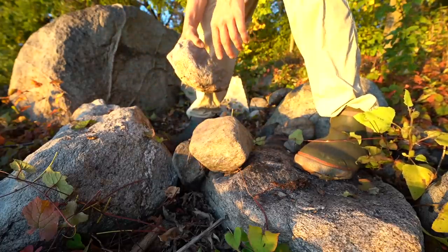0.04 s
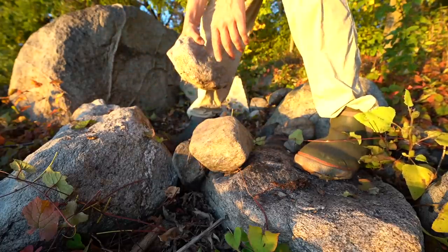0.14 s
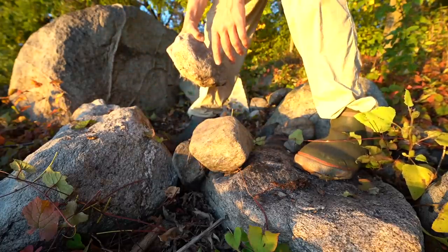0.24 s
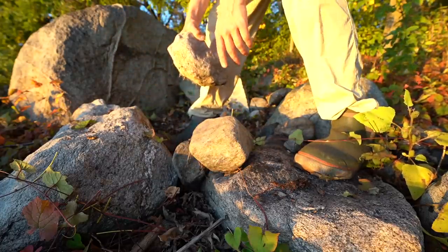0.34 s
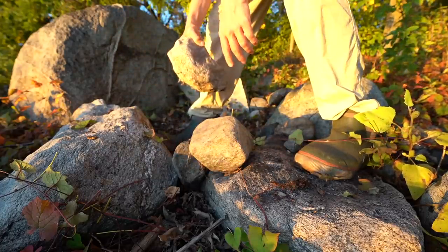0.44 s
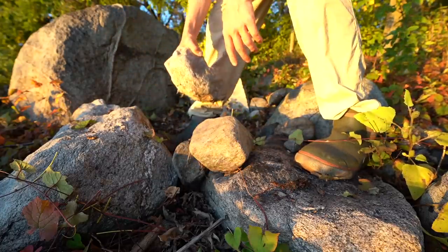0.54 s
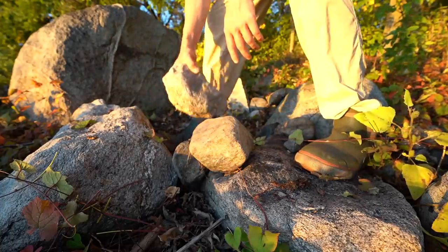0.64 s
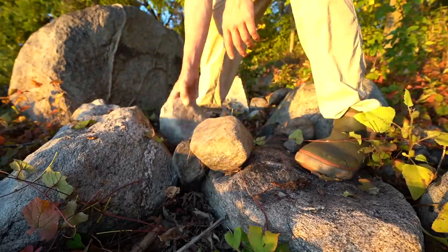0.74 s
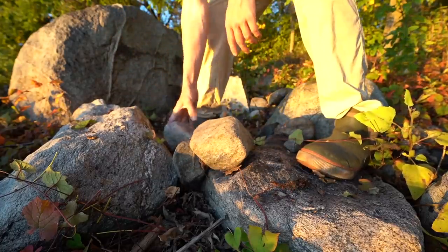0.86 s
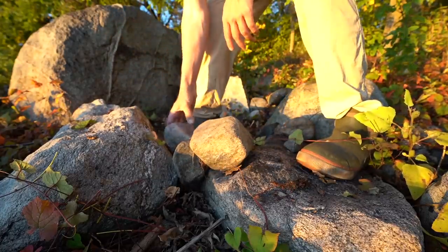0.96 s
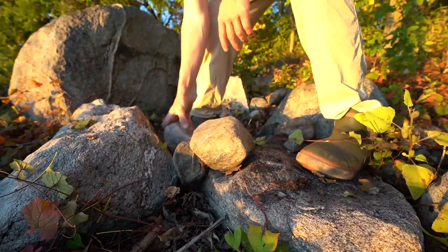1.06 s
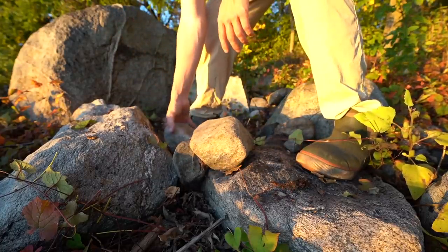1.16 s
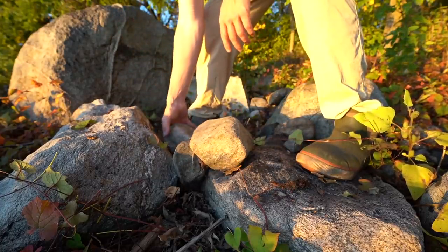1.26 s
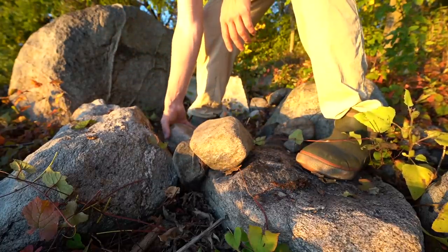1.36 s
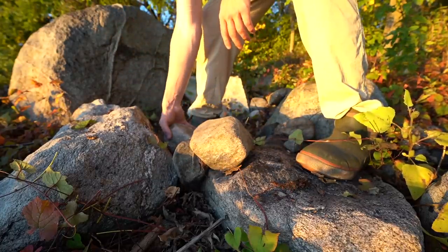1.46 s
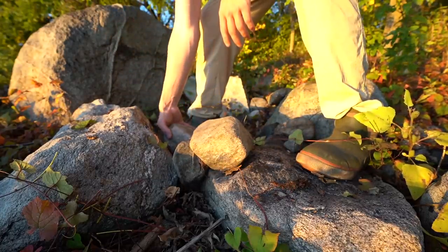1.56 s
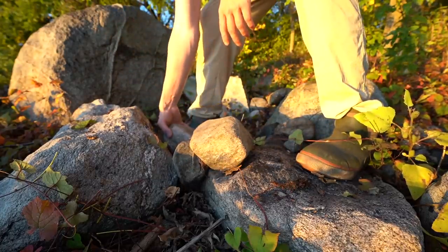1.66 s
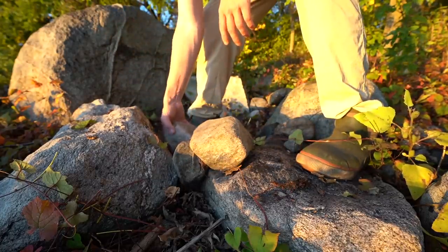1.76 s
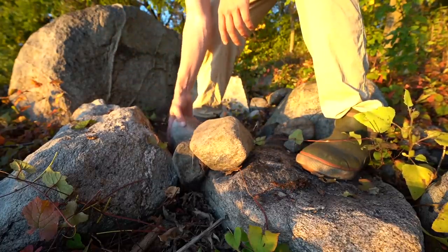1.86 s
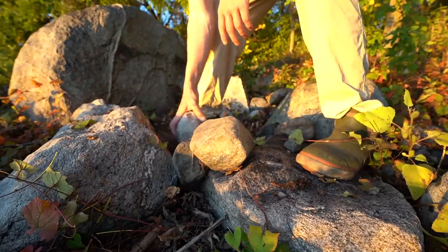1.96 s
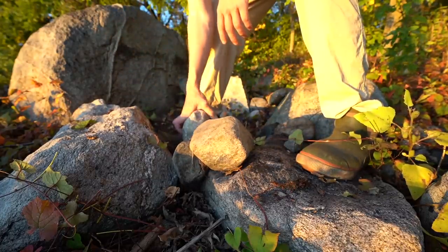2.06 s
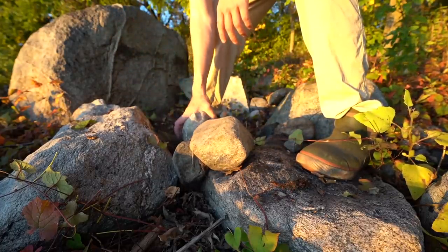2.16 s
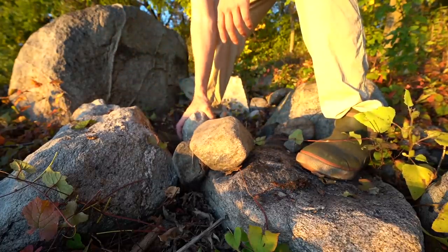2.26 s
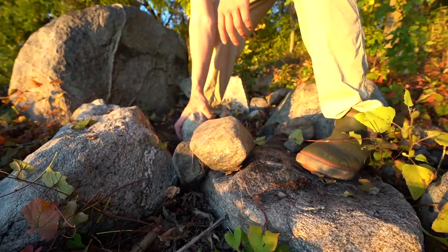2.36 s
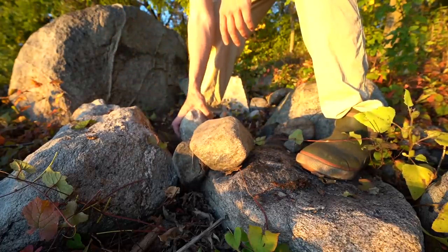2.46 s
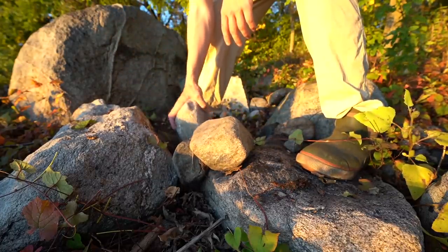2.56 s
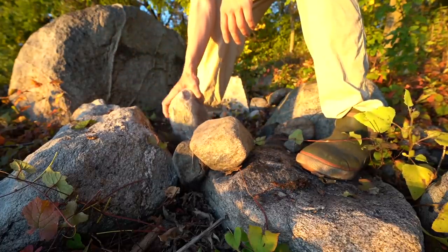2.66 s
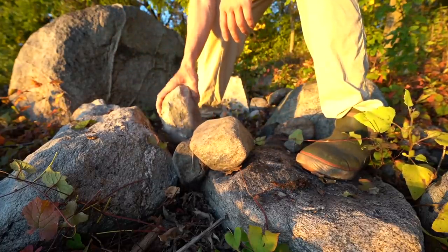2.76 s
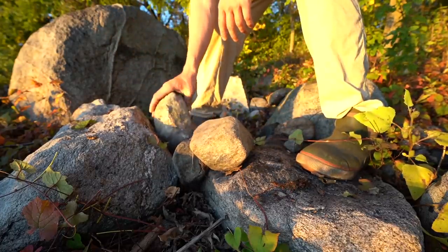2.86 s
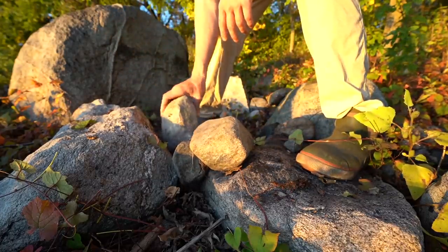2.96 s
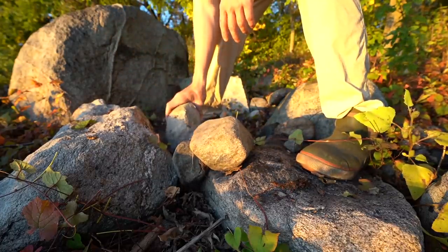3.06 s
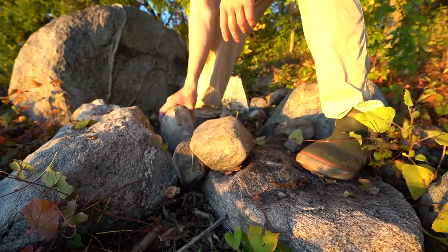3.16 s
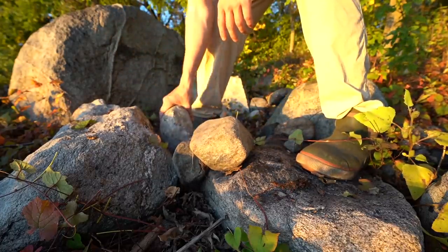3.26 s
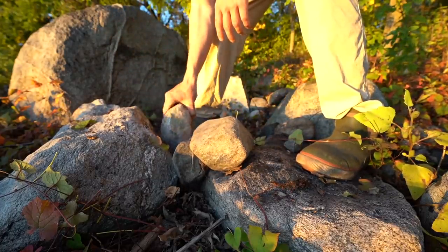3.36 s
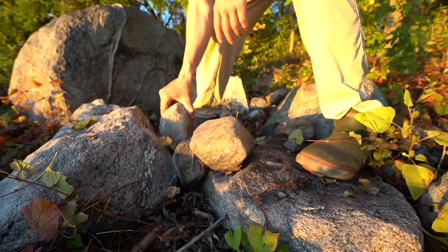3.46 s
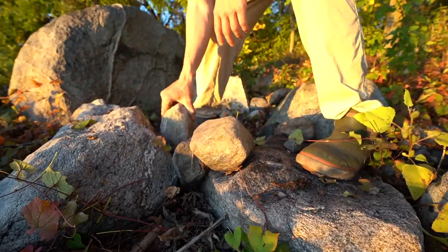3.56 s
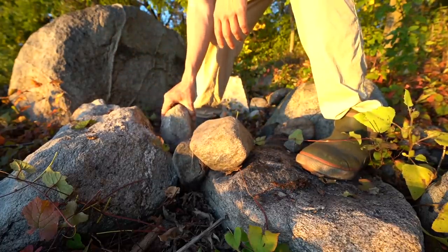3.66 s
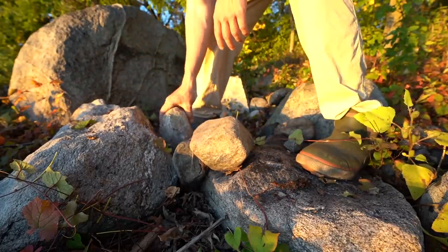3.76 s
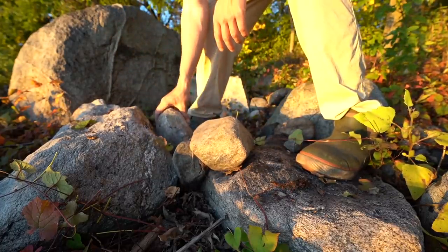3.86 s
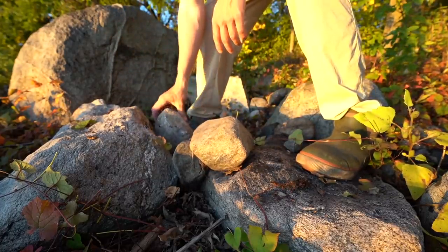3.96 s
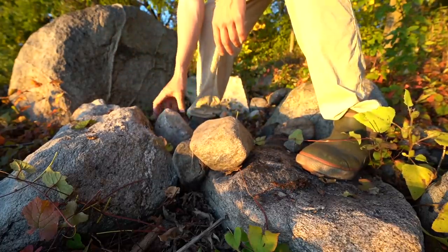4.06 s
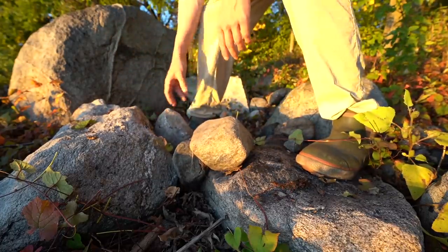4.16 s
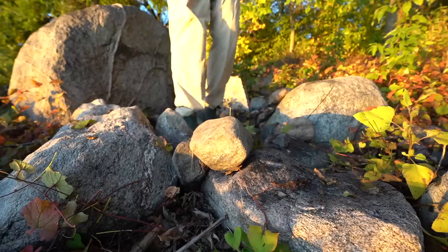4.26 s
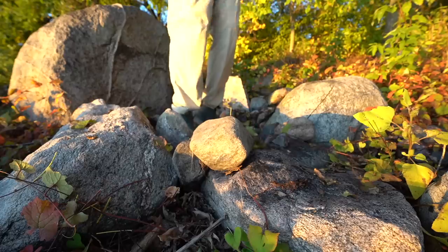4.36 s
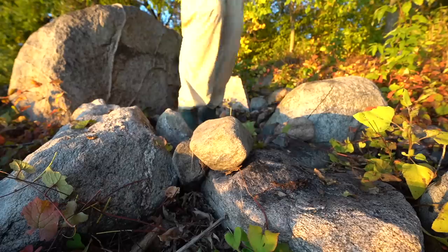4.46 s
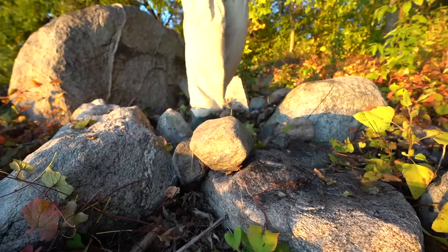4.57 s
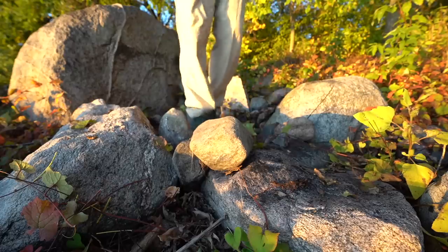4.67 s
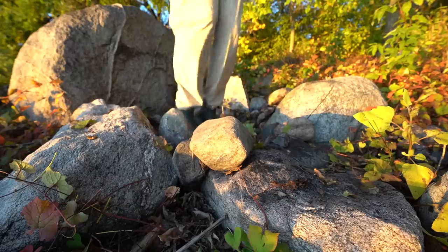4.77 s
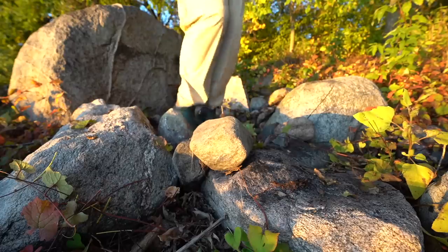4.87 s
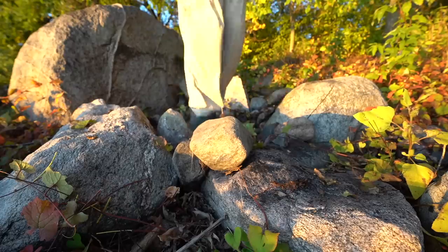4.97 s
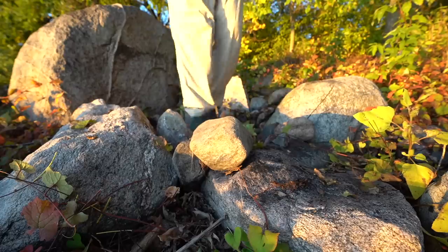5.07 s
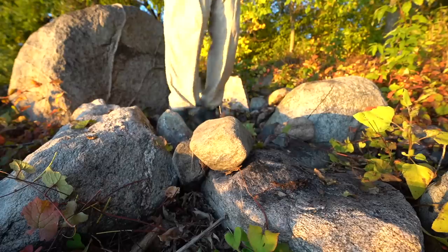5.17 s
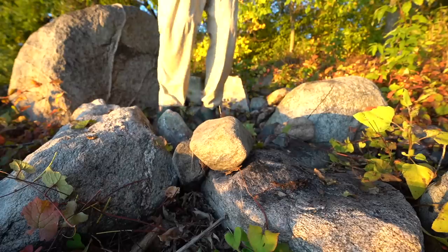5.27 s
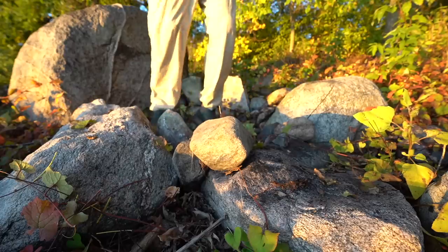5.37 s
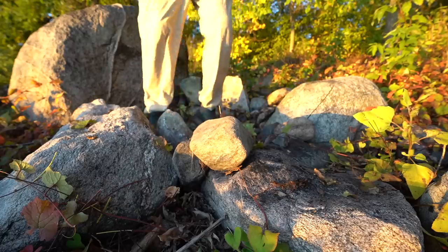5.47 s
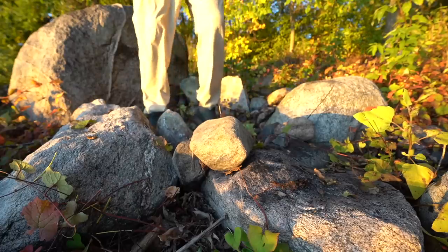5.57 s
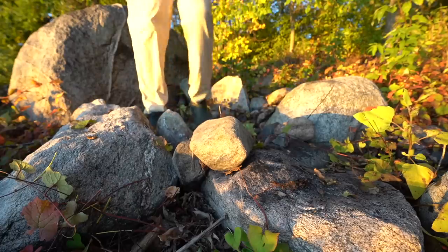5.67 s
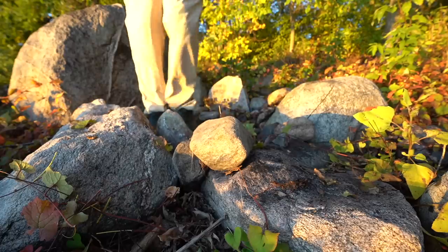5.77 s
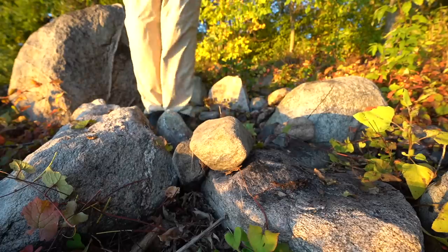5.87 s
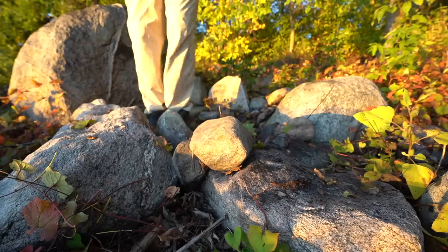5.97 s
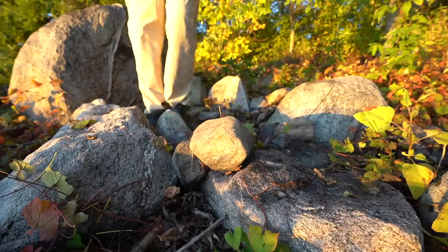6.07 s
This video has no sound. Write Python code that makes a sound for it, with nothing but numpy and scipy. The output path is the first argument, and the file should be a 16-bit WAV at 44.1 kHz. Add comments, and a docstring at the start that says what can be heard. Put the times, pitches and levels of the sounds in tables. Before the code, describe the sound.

Close, dry and detailed: faint stone taps, then a hard triple knock of rock on rock, grinding briefly. Near silence with light rustling and a soft scrape follows, then more solid knocks, a bright chip and smaller rattling contacts as the stone settles. Much quieter dull treads and leaf crunches finish the scene, with small snaps, against soft woodland air, low far rumble and thin insect hiss.

```python
"""A rock is set down in a ring of stones in quiet woodland, shifted, lifted and seated again; then feet
shuffle on dry leaves. Each knock is a short contact pulse with dense reflections off the stones, a hollow
ring from the gap and a slower thump from the soil. Dragged stone grinds and chatters, filtered clicks make
the snaps, and clouds of tiny fractures make grit and leaves. Behind lie a dull tail from the trees, a faint
far rumble, soft air and narrow noise bands for the insects."""
import sys
import numpy as np
from scipy import signal
from scipy.fft import rfft, irfft
from scipy.io import wavfile

SR = 44100
rng = np.random.default_rng(int(sys.argv[2]) if len(sys.argv) > 2 else 0)


def generate_wav(signal):
    """Clip the signal to [-1, 1] and save it as 16-bit WAV at the path in sys.argv[1]."""
    frames = np.transpose(np.atleast_2d(signal))
    scaled = np.clip(frames, -1, 1) * 32767
    pcm = np.round(scaled).astype(np.int16)
    wavfile.write(sys.argv[1], SR, pcm)


N = 269976
T = np.arange(N) / SR

# relative spectrum of crushed grit and rustling leaves: (frequency [Hz], level [dB])
GRIT_SPECTRUM = [(900, 2.5), (1800, 2), (3300, 5.5), (5500, -5), (9000, -3.5), (15000, -6)]


def undb(db):
    """Decibels to gain."""
    return 10 ** (np.asarray(db) / 20)


def unit(x):
    """Scale to rms 1."""
    return x / np.sqrt(np.mean(x ** 2))


def burst(x):
    """Scale a blow to the energy of 10 ms at rms 1."""
    return x * np.sqrt(0.01 * SR / np.sum(x ** 2))


def fade(t60):
    """Half a second of exponential decay that falls 60 dB in t60 seconds."""
    return np.exp(-np.log(1000) * T[:SR // 2] / max(t60, 1e-4))


def ring(hz, t60):
    """One struck mode: a decaying sine."""
    return fade(t60) * np.sin(2 * np.pi * hz * T[:SR // 2])


def cut(x, hz, kind, order=2):
    """Butterworth low-pass or high-pass."""
    corner_hz = min(hz, SR / 2 - 1000)
    return signal.sosfilt(signal.butter(order, corner_hz, kind, fs=SR, output="sos"), x)


def colour(x, points):
    """Give a sound the spectrum of (Hz, dB) points with minimum phase, so nothing sounds early; rms 1."""
    hz, db = np.transpose(points)
    size = 4096
    log_hz = np.log(np.fft.rfftfreq(size, 1 / SR) + 1)
    gain = undb(np.interp(log_hz, np.log(hz), db))
    # folding the cepstrum onto positive time makes the filter causal
    cepstrum = irfft(np.log(gain))
    cepstrum[1:size // 2] *= 2
    cepstrum[size // 2 + 1:] = 0
    impulse = irfft(np.exp(rfft(cepstrum)))
    return unit(signal.fftconvolve(x, impulse)[:len(x)])


def add(out, s, x):
    """Mix a sound in at time s."""
    i = int(s * SR)
    out[i:i + len(x)] += x[:N - i]


def grains(per_s, spread_db):
    """Random tiny fractures as single-sample clicks, most small and a few large; rms 1."""
    size = undb(spread_db * np.minimum(rng.exponential(size=N), 3.5))
    happens = rng.random(N) < per_s / SR
    return unit(happens * size * rng.choice([-1, 1], N))


def crackle(per_s, spread_db, t60):
    """Each fracture is a brief rasp of noise in the band of its own fragment size; rms 1."""
    # size classes of crackling fragments, large to small: (band edge [Hz])
    edges = [700, 2000, 3800, 7000, 11000, 16500]
    out = np.zeros(N)
    for low_hz, high_hz in zip(edges, edges[1:]):
        envelope = signal.fftconvolve(np.abs(grains(per_s, spread_db)), fade(t60))[:N]
        rasp = envelope * rng.standard_normal(N)
        out += cut(cut(rasp, low_hz, "high", order=3), high_hz, "low", order=3)
    return unit(out)


def scattered(scatter_db, t60):
    """A pulse followed by a decaying noise tail: its reflections from the stones close by."""
    tail = rng.standard_normal(SR // 2) * fade(t60)
    tail *= undb(scatter_db) / np.sqrt(np.sum(tail ** 2))
    tail[0] += 1
    return tail


def clack(low_hz, corner_hz):
    """One contact of two stones; high spots on the rough faces add a harder edge to the broad pulse."""
    blow = cut(scattered(scatter_db=5, t60=0.026), low_hz, "high")
    broad = cut(blow, corner_hz, "low", order=6)
    edge = cut(blow, 1.362 * corner_hz, "low", order=4)
    return burst(broad + undb(-12.5) * edge)


def catching(hz, depth_db):
    """Gain of a contact that sticks and gives way at uneven moments; rms 1."""
    wander = unit(cut(rng.standard_normal(N), hz, "low"))
    return unit(undb(depth_db * np.tanh(wander)))


def swell(s, rise, fall):
    """Pressure that builds smoothly to its peak at time s, then lets go exponentially."""
    return np.exp(-np.where(T < s, ((T - s) / rise) ** 2, (T - s) / fall))


def pressing(rows):
    """Summed swells of (s, rise, fall, dull dB, crisp dB) rows: gains of the dull and the crisp part."""
    pushes = np.array([swell(s, rise, fall) for s, rise, fall, _, _ in rows])
    _, _, _, dull_db, crisp_db = np.transpose(rows)
    return undb(dull_db) @ pushes, undb(crisp_db) @ pushes


def knocks():
    """A longer contact gives a duller knock; the gaps between the stones ring briefly and the soil rebounds."""
    # rock on rock: (time [s], level [dB], low cut [Hz], contact corner [Hz],
    # hollow ring relative to the clack [dB], soil thump [dB])
    contacts = [(0.0681, -51, 400, 3500, -20, -70), (0.071, -53, 130, 610, -0.5, -74),
                (0.121, -66, 300, 2800, -15, -77), (0.513, -59.5, 200, 790, -9, -78),
                (0.601, -64.5, 200, 670, 2, -77), (0.831, -13, 117, 1860, -15.5, -27),
                (0.8375, -13, 140, 2120, 0, -30), (0.8788, -14.5, 390, 1360, -17, -30),
                (0.9046, -31, 200, 2120, -9.5, -43.5), (0.924, -24.5, 150, 4900, -7.5, -28.5),
                (0.963, -25, 209, 1215, -8.5, -27.5), (1.007, -44.5, 120, 880, 2, -53.5),
                (1.028, -50.5, 120, 1000, -8, -57), (1.912, -43, 130, 800, -28, -38.5),
                (2.159, -54, 100.6, 1300, -11.5, -43.5), (2.53, -57, 297.8, 1090, -11, -58),
                (2.8617, -18, 130, 1577, 0, -33), (2.9287, -23, 90, 1360, -20, -25),
                (2.972, -49, 200, 1470, 0, -41), (3.002, -54, 130, 1400, -18, -46),
                (3.069, -43, 150, 1420, 2, -37), (3.095, -43.5, 150, 1400, -30, -38),
                (3.202, -43.5, 150, 1520, -12, -34), (3.257, -35.5, 243, 830, 0, -40),
                (3.416, -56, 150, 2040, -17.5, -43), (3.4996, -17, 147, 2060, -2.5, -33),
                (3.518, -37.5, 150, 810, -1, -33), (3.5426, -38.5, 150, 1520, -7, -39.5),
                (3.616, -41, 151, 1930, -14, -40), (3.8066, -39.5, 111, 1590, -1.5, -41),
                (3.936, -47, 120, 710, -5, -41.5), (4.039, -61, 120, 598, -15.5, -48.5)]
    # modes of the soil under the stones: (centre frequency [Hz], relative level [dB], t60 [s])
    soil_modes = [(61.54, 4, 0.25), (72.28, -4.5, .24), (118, -8.5, .2), (175, -7, .11), (266, -10.5, 0.09)]
    out = np.zeros(N)
    for s, db, low_hz, corner_hz, ring_db, soil_db in contacts:
        hollow = cut(ring(0.69 * corner_hz, t60=0.017), 1.1 * corner_hz, "low", order=4)
        stone = burst(clack(low_hz, corner_hz) + undb(ring_db) * burst(hollow))
        add(out, s, undb(db) * stone)

        # the soil yields slowly, so its thump swells after the knock
        soil = np.zeros(SR // 2)
        for hz, mode_db, t60 in soil_modes:
            detune = 1 + 0.033 * rng.standard_normal()
            soil += undb(mode_db) * ring(hz * detune, t60)
        add(out, s, undb(soil_db) * soil * (1 - fade(t60=0.032)))

        # grit is crushed as the soil gives
        crushed = rng.standard_normal(SR // 2) * fade(t60=0.07) * (1 - fade(t60=0.01))
        add(out, s, undb(soil_db - 26.5) * burst(cut(crushed, 2000, "high")))
    return out


def scrapes():
    """Rough faces catch and slip: coarse bumps grind low, high spots chatter and sand grains crack high."""
    # rock dragged over rock: (peak time [s], rise [s], fall [s], grinding [dB], grit [dB])
    drags = [(0.85, 0.021, 0.076, -48.5, -45.5), (1.934, 0.023, 0.028, -47.5, -55.5),
             (2.01, 0.016, 0.099, -61, -82), (2.164, 0.032, 0.014, -46, -49), (3.0, 0.04, 0.077, -48, -88),
             (3.119, 0.06, 0.095, -62.5, -60), (3.414, 0.031, 0.031, -54.5, -64),
             (3.649, 0.035, 0.075, -62, -67.5), (3.826, 0.019, 0.016, -43.5, -62)]
    # relative spectrum of the grinding: (frequency [Hz], level [dB])
    grind_spectrum = [(59, -29), (100, -0.5), (234, 3), (275, -10.5), (355, -5.5), (705, -8.5), (785, -16),
                      (2500, -25), (3250, -58), (5500, -120)]
    grind, grit = pressing(drags)
    bumps = colour(grains(per_s=250, spread_db=0.0), grind_spectrum)
    # the dragged rock trips over high spots in small knocks
    trips = grains(per_s=70, spread_db=4.5)
    chatter = unit(signal.fftconvolve(trips, clack(low_hz=182.8, corner_hz=1500))[:N])
    sand = colour(crackle(per_s=700, spread_db=4.0, t60=0.0057), GRIT_SPECTRUM)
    return catching(hz=70, depth_db=5.0) * (grind * (bumps + undb(-4.5) * chatter) + grit * sand)


def snaps():
    """Brittle breaks: a hard one is a clean click, a weak one tears; the broken piece rings briefly."""
    # chipping stone and snapping twigs: (time [s], level [dB], high cut [Hz])
    breaks = [(0.377, -57, 5000), (0.437, -62, 15000), (0.794, -59, 15000), (1.693, -57.5, 4500),
              (1.897, -59, 5010), (2.238, -66, 9100), (2.354, -65.5, 15000), (2.475, -60.5, 15230),
              (2.557, -59.5, 12000), (2.585, -60, 5900), (2.672, -62, 14000), (2.9287, -33, 15800),
              (3.037, -62, 16000), (3.053, -54.5, 15500), (3.1959, -38.5, 13400), (4.409, -36.5, 10600),
              (4.48, -55, 14200), (4.537, -42, 3530), (4.551, -51, 2600), (4.6371, -39, 4960),
              (5.052, -40, 5000), (5.143, -40.5, 3640), (5.386, -49, 8650), (5.849, -43, 4100)]
    out = np.zeros(N)
    for s, db, high_hz in breaks:
        tearing_db = -6 - 0.3 * (db + 30)
        # a bigger break reaches lower: one octave per 29.5 dB
        low_hz = 1440 * 2 ** ((-40 - db) / 29.5)
        click = cut(scattered(tearing_db, t60=0.022), low_hz, "high")
        click = cut(click, high_hz, "low", order=4)
        piece = ring(3300 * (1 + 0.05 * rng.standard_normal()), t60=0.014)
        piece = cut(burst(piece), low_hz, "high")
        add(out, s, undb(db) * (burst(click) + undb(-10.0) * piece))
    # one flake of stone rings high
    add(out, 2.929, undb(-43.5) * burst(ring(hz=9060, t60=0.028)))
    return out


def footsteps():
    """Soles pack the loose soil in dull lumps and crush the dry leaves on top of it."""
    # a sole rolls onto the ground or pushes off, levels before the trims below:
    # (peak time [s], rise [s], fall [s], weight on the soil [dB], crushed leaves [dB])
    steps = [(4.32, 0.0097, 0.05, -53.5, -57), (4.405, 0.018, 0.063, -48.5, -54),
             (4.604, 0.014, 0.032, -43, -51), (4.656, 0.043, .018, -35.5, -41.5),
             (4.76, 0.034, 0.028, -42.5, -59.5), (4.83, 0.046, 0.036, -44, -58.5),
             (4.885, 0.033, 0.022, -56.5, -51), (4.955, 0.013, 0.017, -42, -52),
             (5.005, 0.02, 0.031, -41, -68), (5.055, 0.038, 0.035, -41, -45), (5.18, .04, .04, -45.5, -68),
             (5.248, 0.031, 0.059, -55, -58.5), (5.42, 0.075, 0.077, -60.5, -53.5),
             (5.635, 0.0046, 0.066, -57.5, -87.5), (5.85, 0.01, 0.03, -35.5, -50.5),
             (5.9, 0.025, 0.015, -39.5, -43), (6.08, 0.066, 0.14, -46, -53.5)]
    # relative spectrum of the packed soil: (frequency [Hz], level [dB])
    tread_spectrum = [(21, -20), (35, -4), (108, -1), (237, -5), (315, -8), (538, -6), (970, -17),
                      (1160, -17.5), (1660, -28.5), (1980, -22), (2500, -30), (3250, -32), (5500, -120)]
    # relative spectrum of the crushed leaves: (frequency [Hz], level [dB])
    leaf_spectrum = [(530, -40), (900, -5), (1390, -6.5), (1640, -4.5), (2040, -7.5), (2390, -11),
                     (3680, -1.5), (5280, -15.5), (10800, -13.5), (14900, -17), (16000, -38)]
    # heels and toes meeting the ground: (time [s], level [dB], contact corner [Hz])
    heels = [(4.59, -36.5, 215), (4.648, -31, 735), (4.671, -39, 450), (4.818, -31, 300),
             (4.994, -34.5, 257), (5.013, -25, 298), (5.247, -41.5, 227), (5.486, -48, 200),
             (6.071, -37.5, 493)]
    weight, crush = pressing(steps)
    soil = undb(1.5) * weight * colour(grains(per_s=1500, spread_db=2.0), tread_spectrum)
    fractures = crackle(per_s=850, spread_db=2.5, t60=0.0055)
    leaves = undb(-0.5) * crush * colour(fractures, leaf_spectrum)
    # small sticks under the leaves crack only when weight bears on them
    sticks = unit(cut(crackle(per_s=200, spread_db=5.0, t60=0.015), 3630, "low", order=6))
    out = catching(hz=45.0, depth_db=2.5) * (soil + undb(-13) * weight * sticks) + leaves
    for s, db, corner_hz in heels:
        thud = cut(scattered(scatter_db=1.5, t60=0.065), 0.25 * corner_hz, "high")
        thud = cut(thud, corner_hz, "low", order=4)
        add(out, s, undb(db) * burst(thud))
    return out


def stirring():
    """Leaves slide softly over each other underfoot, with lone ticks of small sticks."""
    # level of the rustle, which the ticks follow: (time [s], level [dB])
    stir_level = [(0, -82.5), (.42, -65.5), (.7, -73.5), (1.05, -76), (1.4, -88.5), (1.68, -69.5),
                  (2.05, -64.5), (2.3, -74.5), (2.58, -63), (2.75, -76.5), (3.0, -67), (3.4, -69.5),
                  (4.1, -72.5), (4.3, -61.5), (6.12, -74.5)]
    rustle = crackle(per_s=59, spread_db=5.5, t60=0.016) + undb(-1.0) * rng.standard_normal(N)
    ticks = grains(per_s=14, spread_db=2.5)
    ticks = signal.fftconvolve(ticks, scattered(scatter_db=7, t60=0.02))[:N]
    ticks = unit(cut(cut(ticks, 1300, "high"), 6000, "low", order=1))
    level = undb(np.interp(T, *np.transpose(stir_level)))
    return level * (colour(rustle, GRIT_SPECTRUM) + undb(-10) * ticks)


def trees(x):
    """Trunks and foliage send back a faint, dull tail."""
    tail = rng.standard_normal(SR // 2) * fade(t60=0.32) * (1 - fade(t60=0.045))
    tail = cut(tail, 5500, "low", order=1)
    tail /= np.sqrt(np.sum(tail ** 2))
    return undb(-35.0) * signal.fftconvolve(x, tail)[:N]


def woodland():
    """Far rumble and soft air are coloured noise; many insects merge into narrow bands that swell and fade."""
    # relative spectrum of the far rumble: (frequency [Hz], level [dB])
    rumble_spectrum = [(20, -16), (45, -7), (80, 4), (105, 0), (135, -18), (180, 2.5), (205, -10.5),
                       (240, -38.5)]
    # relative spectrum of the air: (frequency [Hz], level [dB])
    air_spectrum = [(150, 5.5), (400, 5), (1000, -1), (2200, -11.5), (3800, 4), (5000, -4), (6000, -20),
                    (16000, -22.5)]
    # insects: (centre [Hz], width [Hz], peak level [dB], time of the loudest [s], half length [s])
    insects = [(4600, 300, -76.5, 3.3, 6), (4900, 650, -78.5, 1.8, 2.5), (5250, 450, -80, 1.3, .28)]
    rumble = undb(-67.5) * colour(rng.standard_normal(N), rumble_spectrum)
    air = undb(-74.3) * colour(rng.standard_normal(N), air_spectrum)
    out = rumble + air
    for hz, width_hz, db, s, half in insects:
        # slow noise times a sine gives a band around the sine
        slow = cut(rng.standard_normal(N), width_hz / 2, "low", order=3)
        chorus = unit(slow * np.sin(2 * np.pi * hz * T))
        out += undb(db) * chorus * np.exp(-((T - s) / half) ** 2)
    return out


def scene():
    """Stones and feet close by, the wood around them."""
    near = knocks() + scrapes() + snaps() + footsteps() + stirring()
    return (near + trees(near) + woodland())[None]


def record(dry):
    """The microphone thins the deepest bass; the recorder rounds peaks near full scale and cuts the top."""
    x = cut(dry, 35, "high")
    x = x / (1 + x ** 6) ** (1 / 6)
    top_hz, ripple_db, stop_db = 16500, 0.2, 60
    return signal.sosfilt(signal.ellip(8, ripple_db, stop_db, top_hz, fs=SR, output="sos"), x)


dry = scene()
out = record(dry)
generate_wav(out)
```